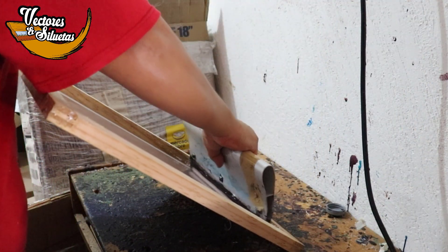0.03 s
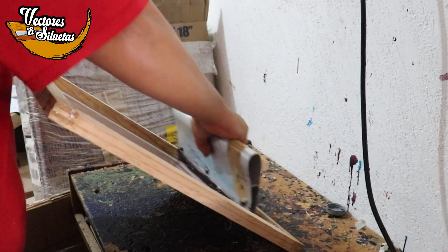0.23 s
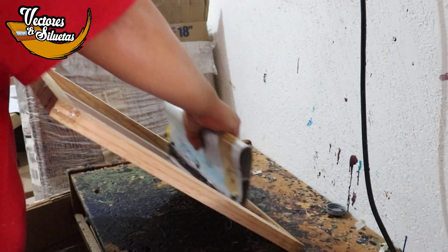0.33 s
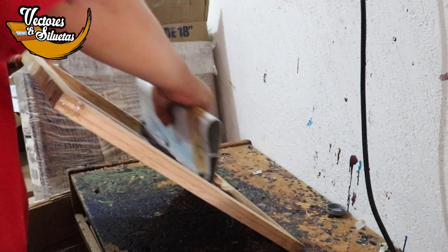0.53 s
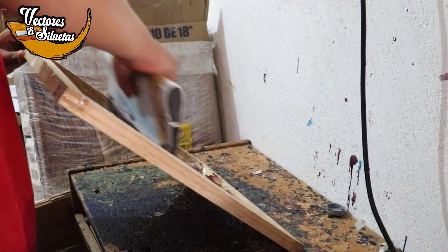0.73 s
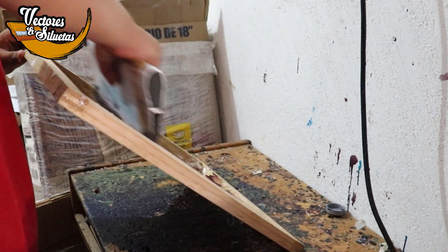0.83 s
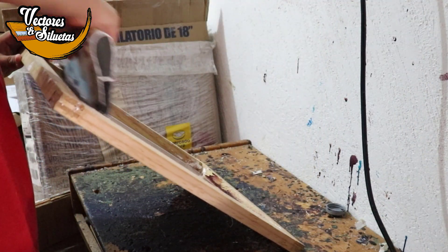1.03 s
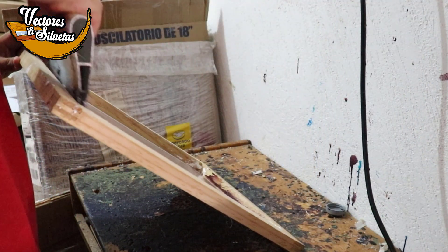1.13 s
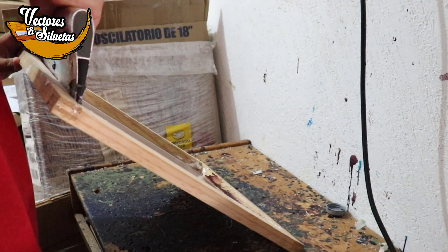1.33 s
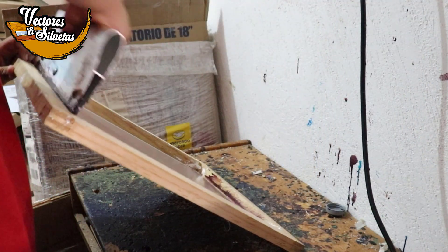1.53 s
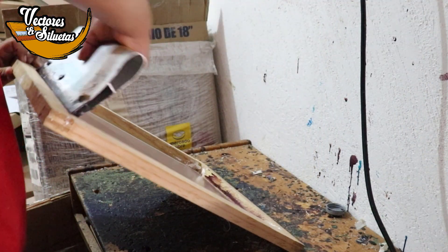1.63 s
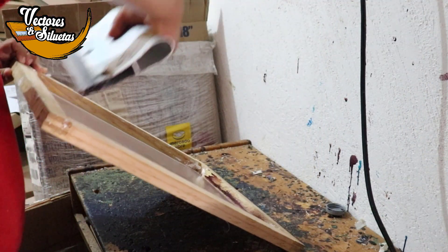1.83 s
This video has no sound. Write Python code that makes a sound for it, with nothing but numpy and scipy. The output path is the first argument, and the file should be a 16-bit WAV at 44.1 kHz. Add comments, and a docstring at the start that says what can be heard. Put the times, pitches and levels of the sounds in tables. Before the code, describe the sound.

In a small, quiet workshop, a nearby metal edge drags across tight mesh with a squeak and a gritty, whistling scrape that climbs in pitch. It slows and thuds on the wooden frame, followed by light knocks and faint chafing.

```python
"""In a small workshop a metal coating trough chafes and creaks on a taut mesh screen, then is drawn up it.
Its edge ticks over the threads, so the tone rises and falls with the speed of the hand, and it squeaks
where that tone meets the ring of the mesh. It stops with a thud against the wooden frame,
then judders on the mesh as it is tipped back and lifted."""
import sys
import numpy as np
from scipy import signal
from scipy.fft import rfft, irfft
from scipy.io import wavfile
from scipy.ndimage import uniform_filter1d

SR = 44100
rng = np.random.default_rng(int(sys.argv[2]) if len(sys.argv) > 2 else 0)


def generate_wav(signal):
    """Clip the signal to [-1, 1] and save it as 16-bit WAV at the path in sys.argv[1]."""
    frames = np.transpose(np.atleast_2d(signal))
    scaled = np.clip(frames, -1, 1) * 32767
    pcm = np.round(scaled).astype(np.int16)
    wavfile.write(sys.argv[1], SR, pcm)


N = 83790

# The stroke, its pitch being threads crossed per second: time_s, pitch_hz, level_db
STROKE = [(.1, 598.4, -69), (.2, 760, -32.5), (.27, 815, -35), (.32, 935.6, -34), (.4, 1232, -28.5),
          (.45, 1435, -28.5), (.52, 1594, -27.5), (.59, 1696, -31), (.67, 1690, -30), (.76, 1681, -30.5),
          (.85, 1729, -31), (.93, 1781, -30.5), (1.02, 1727, -30), (1.07, 1555, -31.5),
          (1.112, 1481, -29.5), (1.135, 1423, -24.5), (1.19, 1328, -28.5), (1.25, 1168, -35),
          (1.31, 829, -57), (1.44, 817, -87)]
# Partials of the thread tone; the over-and-under weave gives the halves: pitch_multiple, level_db
WEAVE = [(.5, -28.5), (1, -2.5), (1.5, -18.5), (2, -17), (2.5, -25.5), (3, -27.5), (3.5, -34), (4, -36),
         (5, -42.5)]
FULL_SPEED_HZ = 1720
WANDER_HZ, WANDER_PER_S = 20, 43.8  # pitch drift: spread, speed


def undb(db):
    """Decibels to gain."""
    return 10 ** (np.asarray(db) / 20)


def unit(x):
    """Scale to rms 1."""
    return x / np.sqrt(np.mean(x ** 2))


def curve(rows, column=1):
    """One column of a time table at every sample."""
    rows = np.array(rows)
    return np.interp(np.arange(N) / SR, rows[:, 0], rows[:, column])


def colour(x, points, power=1):
    """Equalise along (Hz, dB) points; power scales the decibels."""
    hz, db = np.array(points).T
    f = np.fft.rfftfreq(2 * N, 1 / SR)
    gain = undb(power * np.interp(np.log(f + 1), np.log(hz), db))
    return irfft(rfft(x, 2 * N) * gain)[:N]


def walk(rate):
    """Smooth random drift of rms 1, with up to about rate changes a second."""
    f = np.arange(N // 8) * SR / N
    real, imag = rng.standard_normal((2, len(f)))
    return unit(irfft((real + 1j * imag) * np.exp(-np.minimum(f / rate, 10) ** 2), N))


def grit(spectrum, grain_db=.5):
    """Dense tiny slips of uneven size with the given spectrum."""
    return unit(colour(rng.standard_normal(N) * undb(grain_db * walk(960)), spectrum))


def room_tone(level_db=-59.5):
    """The steady low hush of the workshop."""
    # Colour of the hush: frequency_hz, relative_db
    spectrum = [(25, -52), (60, 4.5), (90, -1), (125, 9.5), (180, -10.5), (500, -13), (1500, -8.5),
                (4000, -21.5), (10000, -27.5), (15000, -42.5)]
    return undb(level_db) * unit(colour(rng.standard_normal(N), spectrum))


def reverb(x, t60_s=.5, level_db=-9.5):
    """Short diffuse tail of the workshop."""
    t = np.arange(SR // 2) / SR
    tail = rng.standard_normal(len(t)) * np.exp(-np.log(1000) * t / t60_s) * (t > .005)
    return undb(level_db) * signal.fftconvolve(x, tail / np.linalg.norm(tail))[:N]


def frame_ring():
    """How screen and frame ring after a sharp tap."""
    # Their modes: pitch_hz, level_db, t60_s
    modes = [(138.3, -1, 0.08), (130, -12.5, 0.83), (177, -8.5, 0.19), (267.1, -2.5, 0.29),
             (341.6, -10.5, 0.19), (398, -11, 0.14), (556.4, -3, 0.085), (905, -6, 0.14)]
    t = np.arange(N) / SR
    return sum(undb(db) * np.cos(2 * np.pi * hz * t) * np.exp(-np.log(1000) * t / t60)
               for hz, db, t60 in modes)


def scuffs(band_hz=(320, 2160), decay_s=.014):
    """Short dry rasps as the trough shifts in the hand."""
    # Light scuffs: start_s, level_db
    shifts = [(1.428, -50.5), (1.506, -49), (1.67, -50)]
    t = np.arange(N) / SR
    band = signal.butter(2, band_hz, "band", fs=SR, output="sos")
    rasp = unit(signal.sosfilt(band, rng.standard_normal(N)))
    ages = [(np.maximum(t - at, 0) / decay_s, db) for at, db in shifts]
    return rasp * sum(undb(db) * np.exp(-age) * (1 - np.exp(-10 * age)) for age, db in ages)


def chafe(ring_db=-5):
    """The edge chafes dully as it is set and tipped back, heard directly and through the frame."""
    # Swell of the chafing: time_s, level_db
    envelope = [(0, -46), (.07, -46.5), (.13, -52), (.3, -69), (1.12, -62.5), (1.4, -52), (1.47, -46),
                (1.52, -40), (1.58, -40.5), (1.63, -43), (1.73, -57.5), (1.9, -63.5)]
    # Its colour: frequency_hz, relative_db
    spectrum = [(70, -30), (150, 0), (330, 6), (580, 1), (2000, -16), (3500, -29.5), (15000, -55.5)]
    slips = grit(spectrum) * undb(curve(envelope))
    ring = unit(signal.fftconvolve(slips, frame_ring())[:N])
    return slips + undb(ring_db) * np.std(slips) * ring


def creaks(half_length_s=.012, rise_per_s=9.1):
    """The edge slips in short upward glides before it runs freely."""
    # Opening creaks: peak_s, pitch_hz, peak_db
    slips = [(.04, 278, -42.5), (.063, 429, -39), (.088, 643, -43)]
    t, out = np.arange(N) / SR, 0
    for at, hz, db in slips:
        age = t - at
        phase = 2 * np.pi * hz * age * (1 + rise_per_s * age / 2)
        out += undb(db) * np.exp(-(age / half_length_s) ** 2) * np.sin(phase)
    return out


def mesh_ring(width_hz=63):
    """The narrow resonance of the free mesh, kept ringing by the rubbing."""
    # Ring of the free span, which shortens as the edge climbs: time_s, pitch_hz, level_db
    resonance = [(.15, 765.6, -63), (.21, 760, -42), (.305, 756.2, -40), (.4, 749, -48.5),
                 (.55, 771.6, -49), (1.0, 905, -48.5), (1.12, 900.7, -69), (1.26, 835, -74),
                 (1.32, 819, -39), (1.46, 808, -74)]
    phase = 2 * np.pi * np.cumsum(curve(resonance)) / SR
    ring = walk(width_hz) * np.sin(phase) + walk(width_hz) * np.cos(phase)
    return ring * undb(curve(resonance, column=2))


def friction(treble_hz=3020, db_per_speed_doubling=24.5):
    """Gritty hiss of the sliding edge, brighter with speed."""
    # Swell of the hiss: time_s, level_db
    envelope = [(0, -40.5), (.04, -50.5), (.11, -47), (.17, -42), (.24, -38.5), (.33, -37), (.56, -45.5),
                (1.08, -45), (1.2, -41.5), (1.29, -38.5), (1.39, -55), (1.55, -88)]
    # Its colour at full speed: frequency_hz, relative_db
    spectrum = [(60, -44), (130, -17), (600, -4), (1200, 0.5), (2300, -3), (3600, -7), (5500, -16.5),
                (9000, -20), (15500, -25.5)]
    hiss = grit(spectrum)
    dull = signal.sosfiltfilt(signal.butter(1, treble_hz, fs=SR, output="sos"), hiss)
    treble_gain = undb(db_per_speed_doubling * np.log2(curve(STROKE) / FULL_SPEED_HZ))
    return (dull + treble_gain * (hiss - dull)) * undb(curve(envelope))


def knocks(crack_db=1, crack_s=.003, crack_top_hz=1500, low_cut_hz=111):
    """Each blow rings screen and frame with a short crack; a softer push leaves only the low modes."""
    # The thud and the lighter bumps after it: start_s, level_db, softness_ms
    blows = [(1.312, -16.5, 1.97), (1.328, -23.5, 3), (1.502, -37.5, .35), (1.543, -33.5, 0.55),
             (1.636, -56, 1.3)]
    t, out, ring = np.arange(N) / SR, np.zeros(N), frame_ring()
    lowpass = signal.butter(2, crack_top_hz, fs=SR, output="sos")
    for at, db, soft_ms in blows:
        noise = unit(signal.sosfilt(lowpass, rng.standard_normal(N)))
        crack = undb(crack_db) * noise * np.exp(-t / crack_s)
        soft_s = soft_ms / 1000
        push = np.exp(-t / soft_s) * (1 - np.exp(-2 * t / soft_s))
        blow = signal.fftconvolve(ring + crack, push / push.sum())
        start = int(at * SR)
        out[start:] += undb(db) * blow[:N - start]
    # The knocks carry no deep bass.
    return signal.sosfilt(signal.butter(4, low_cut_hz, "high", fs=SR, output="sos"), out)


def squeaks(partials_db=(.5, -21.5, -35.5), waver_hz=6.7):
    """Brief clean swells when the whole edge slips in step; their pitch wavers a little."""
    # Squeaks and groans: peak_s, half_length_s, pitch_hz, peak_db
    slips = [(.221, .0115, 762, -16.5), (.247, .0075, 762, -20), (.338, .012, 2290, -36),
             (.583, .025, 3520, -38), (.84, .022, 3480, -37), (.661, .004, 1700, -21),
             (.68, .006, 1720, -25), (1.014, .004, 1750, -21), (1.131, .004, 1440, -23),
             (1.143, .013, 275, -43), (1.291, .012, 860, -34), (1.555, .04, 570, -40),
             (1.572, .025, 266, -34.5), (1.59, .025, 390, -41), (1.655, .05, 277, -38)]
    t, out = np.arange(N) / SR, 0
    for at, half, hz, db in slips:
        phase = 2 * np.pi * np.cumsum(hz + waver_hz * walk(WANDER_PER_S)) / SR
        tone = sum(gain * np.sin(k * phase) for k, gain in enumerate(undb(partials_db), 1))
        out += undb(db) * np.exp(-((t - at) / half) ** 2) * tone
    return out


def whistle(lead_hz=28.13, flutter=.7):
    """The leading corner grips more steadily and sings clean overtones; higher ones flutter faster."""
    # Whistle level against the thread tone: time_s, relative_db
    balance = [(.33, 5), (.45, -1.5), (.85, 1.5), (1.0, -6), (1.15, -16)]
    hz = uniform_filter1d(curve(STROKE), SR // 20) + lead_hz + WANDER_HZ / 2 * walk(WANDER_PER_S)
    phase = 2 * np.pi * np.cumsum(hz) / SR
    overtones = sum(undb(db) * np.sin(multiple * phase) * (1 + flutter * walk(multiple * WANDER_PER_S))
                    for multiple, db in WEAVE if multiple > 1)
    return overtones * undb(curve(STROKE, column=2) + curve(balance))


def thread_tone(points=5, skew_hz=27.07, lag_s=.036, flutter_per_s=113):
    """Several points of the edge tick over the threads with a fluttering grip, brighter with speed."""
    hz = uniform_filter1d(curve(STROKE), SR // 50)
    brightness = undb(-1.5 + 4 * np.log2(hz / FULL_SPEED_HZ))  # 4 dB per doubling of speed
    # One end trails, more so when the hand changes speed; it bites less and sounds weaker.
    acceleration = uniform_filter1d(np.gradient(hz) * SR, SR // 10)
    skew = skew_hz + lag_s * np.abs(acceleration)
    leads = .62 - 2 * np.linspace(1, 0, points) ** 2
    bites = unit(undb(1.5 * leads))
    out = 0
    for lead, bite in zip(leads, bites):
        point_hz = hz + lead * skew + WANDER_HZ * walk(WANDER_PER_S)
        phase = 2 * np.pi * (np.cumsum(point_hz) / SR + 2 * rng.random())
        for multiple, db in WEAVE:
            grip = (1 + walk(flutter_per_s)) / np.sqrt(2)
            gain = undb(db) * (1 if multiple == 1 else brightness)
            out += gain * bite * grip * np.sin(multiple * phase)
    return out * np.sqrt(2 / points) * undb(curve(STROKE, column=2))


def sustained_layers():
    """All the rubbing of the edge over the room tone, with fresh grain on each call."""
    return thread_tone() + whistle() + friction() + chafe() + mesh_ring() + scuffs() + room_tone()


def scene():
    """The wide screen reaches the two microphones alike in the bass and unrelated in the treble."""
    # Stereo width: frequency_hz, side_gain_db
    width = [(60, -24), (250, -17.5), (1200, -3.5), (2000, -2.5), (4000, 0), (15000, 1.5)]
    # Stereo balance: frequency_hz, right_over_left_db
    pan = [(100, -0.9), (600, -1.7), (2500, -0.1), (9500, 0.5), (12000, 4), (15000, 12)]
    direct = sustained_layers() + creaks() + squeaks() + knocks()
    side = colour(sustained_layers() + reverb(direct), width)
    mid = direct + reverb(direct)
    return np.array([colour(mid + side, pan, -1 / 2), colour(mid - side, pan, 1 / 2)])


def record(dry):
    """A steep low-pass takes off the air above 15.6 kHz."""
    return signal.sosfilt(signal.ellip(10, .2, 80, 15600, fs=SR, output="sos"), dry)


dry = scene()
out = record(dry)
generate_wav(out)
```